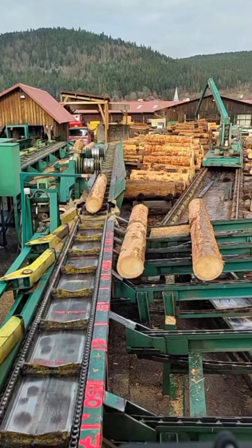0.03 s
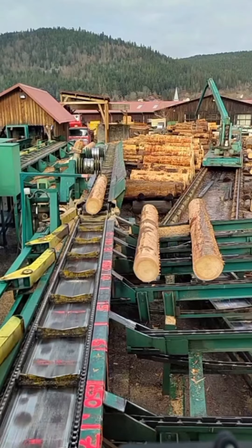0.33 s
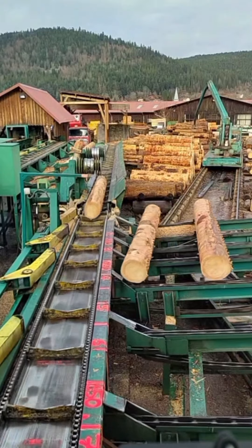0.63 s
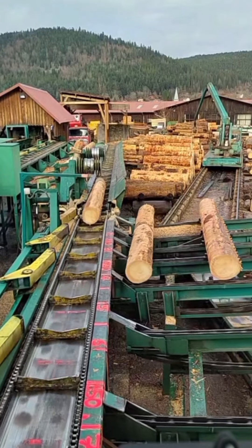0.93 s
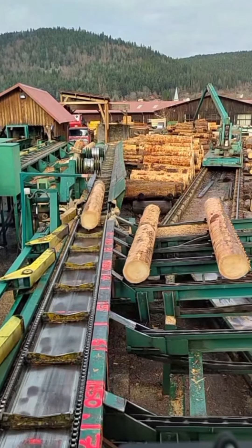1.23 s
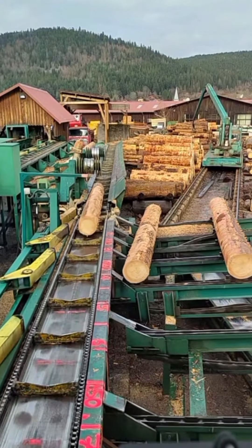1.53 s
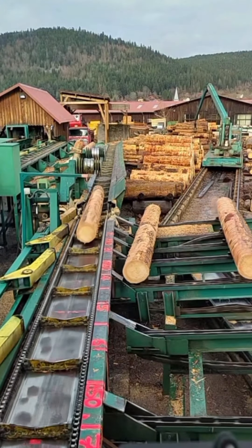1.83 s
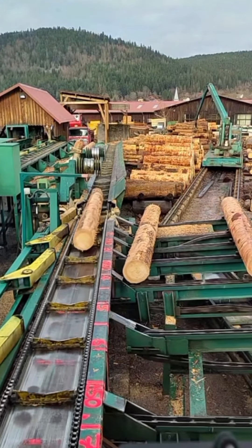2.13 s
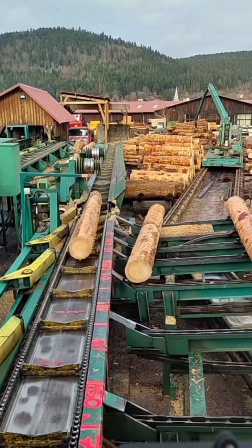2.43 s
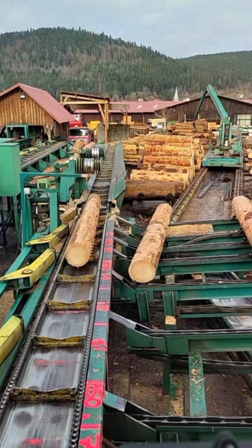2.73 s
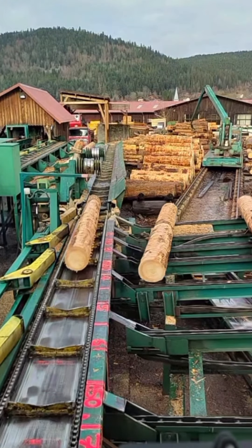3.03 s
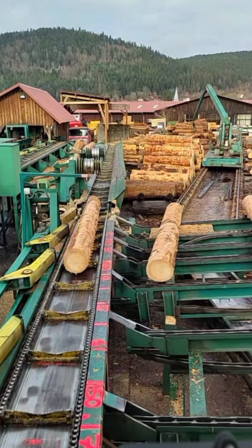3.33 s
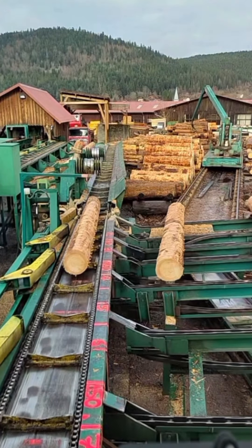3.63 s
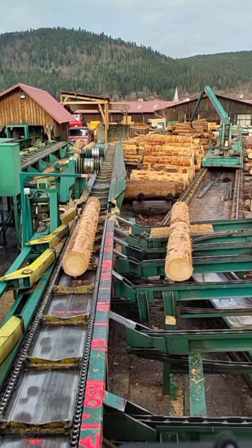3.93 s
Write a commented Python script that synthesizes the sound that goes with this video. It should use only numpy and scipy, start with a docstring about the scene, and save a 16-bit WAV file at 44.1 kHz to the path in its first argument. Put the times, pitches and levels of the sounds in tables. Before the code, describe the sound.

A log conveyor hums and rumbles throughout, over the hiss of distant machinery. Bark scuffs lightly, then steel clanks sharply at 0.6 seconds. Chains drag and groan on the track until nearly 3 seconds. Logs boom low and knock with a rattle around 1.1 seconds and harder at 2.7. Wood clacks far off at 3.6, and the hum cuts out with a last knock near 4 seconds.

```python
"""A sawmill log conveyor's drive hums near 300 Hz, sags as logs jolt it, and cuts out at the end.
The frame rumbles under the hiss of distant machinery; dragging chains ring the steel track
and groan where they catch. Bark scuffs, steel clanks once, logs boom and knock on the frame,
and wood clacks far off in the open yard. A fast limiter ducks the hum under loud blows."""
import sys
import numpy as np
from scipy.fft import rfft, irfft, next_fast_len
from scipy.io import wavfile
from scipy.ndimage import uniform_filter1d, minimum_filter1d, map_coordinates

SR = 44100
rng = np.random.default_rng(int(sys.argv[2]) if len(sys.argv) > 2 else 0)


def store_wav(level_fs):
    """Save 16-bit WAV to argv[1]."""
    pcm = np.round(np.clip(np.atleast_2d(level_fs), -1, 1) * 32767)
    wavfile.write(sys.argv[1], SR, pcm.T.astype(np.int16))


N = 176400
T = np.arange(N) / SR


def amp(db):
    """Decibels to gain."""
    return 10 ** (np.asarray(db) / 20)


def unit(x):
    """Scale to rms 1."""
    return x / np.sqrt(np.mean(x ** 2) + 1e-20)


def log_interp(points, hz):
    """(f/Hz, value) points, interpolated over log frequency."""
    f, value = np.transpose(points)
    return np.interp(np.log(hz + 1), np.log(f + 1), value)


def curve(points):
    """(t/s, value) points, interpolated per sample."""
    return np.interp(T, *np.transpose(points))


def wobble(knots_per_s):
    """Smooth random curve, rms near 1."""
    return map_coordinates(rng.standard_normal(2048), [T * knots_per_s], mode="wrap")


def rough_tone(phase, knots_per_s):
    """Narrow noise band around a running phase, rms near 1."""
    return wobble(knots_per_s) * np.sin(phase) + wobble(knots_per_s) * np.cos(phase)


def blow(start_s, rise_s, t60_s):
    """Impact envelope: linear rise, exponential decay."""
    age = T - start_s
    return np.clip(age / rise_s, 0, 1) * amp(-60 * np.maximum(age - rise_s, 0) / t60_s)


def swell(centre_s, length_s):
    """Half-cosine envelope."""
    return np.cos(np.pi * np.clip((T - centre_s) / length_s, -.5, .5))


def filtered(x, response):
    """Apply a frequency response."""
    size = next_fast_len(N + SR // 2)
    hz = np.fft.rfftfreq(size, 1 / SR)
    return irfft(rfft(x, size) * response(hz), size)[..., :N]


def colour(points):
    """Response through (f/Hz, gain/dB) points."""
    return lambda hz: amp(log_interp(points, hz))


def body(modes):
    """Response of parallel resonances, alternating in sign."""
    return lambda f: sum((-1) ** k * amp(db) * 1j * f * width / (f0 * f0 - f * f + 1j * f * width)
                         for k, (f0, width, db) in enumerate(modes))


# left-right coherence: f/Hz, correlation
COHERENCE = [(4100, 1), (4500, .92), (5500, .85), (7000, .94), (8000, .88), (9000, .5), (13000, .35)]

def noise(response):
    """Stereo noise of rms 1, mono in the bass, wider in the treble."""
    def mid_side_response(hz):
        angle = np.arccos(np.clip(log_interp(COHERENCE, hz), -1, 1)) / 2
        return response(hz) * np.array([np.cos(angle), np.sin(angle)])
    mid, side = filtered(rng.standard_normal((2, N)), mid_side_response)
    return unit(np.array([mid + side, mid - side]))


# drive pitch: t/s, f/Hz
HUM_PITCH = [(.1, 301.2), (.3, 300.5), (.55, 298.3), (.9, 300), (1.14, 293.8), (1.26, 300.8), (1.65, 298.2),
             (1.82, 300.3), (2.1, 296.5), (2.3, 300), (2.58, 298.5), (2.7, 290.8), (2.86, 299.4),
             (3.25, 299.6), (3.5, 300.6), (3.7, 298.5), (3.82, 300), (3.95, 294.8)]
# hum, sagging at log jolts: t/s, level/dB
HUM_LEVEL = [(.1, -34.5), (.4, -33.5), (.7, -37), (1.0, -34), (1.17, -38.5), (1.35, -34.5), (2.55, -35),
             (2.63, -39.5), (2.76, -37.5), (2.9, -34.5), (3.35, -32), (3.7, -35), (3.95, -34)]
OCTAVE_DB, OCTAVE_SAG_DB, FLUTTER_DB = -22, 5.5, -45.5
SWAY_RAD, STOP_S, FADE_S = .26, 3.953, .015

def drive():
    """Drive hum with a weak, rough octave; chain load adds sway and flutter and sinks the octave."""
    drag_db, hum_db = curve(CHAIN_DRAG), curve(HUM_LEVEL)
    load = amp(drag_db - drag_db.max())
    sway = SWAY_RAD * (.28 + load) * wobble(15)
    phase = 2 * np.pi * np.cumsum(curve(HUM_PITCH)) / SR + sway
    tone = amp(hum_db + .9 * wobble(23.97)) * np.sin(phase)
    octave_db = hum_db + OCTAVE_DB - OCTAVE_SAG_DB * load + 1.8 * wobble(9.7)
    octave = amp(octave_db) * (np.sin(2 * phase) + .33 * rough_tone(2 * phase, 50))
    flutter = amp(FLUTTER_DB) * (.3 + .5 * load) * rough_tone(phase, 60)
    running = np.clip(1 - (T - STOP_S) / FADE_S, 0, 1)
    return (np.sqrt(2) * (tone + octave) + flutter) * running


# frame shaking, before trim: t/s, level/dB
RUMBLE_LEVEL = [(.1, -46.5), (.5, -47.5), (.8, -45.5), (.95, -46.5), (1.1, -44.5), (1.35, -46.5),
                (1.6, -45.5), (2.1, -50), (2.5, -46.5), (2.75, -47), (3.0, -46), (3.35, -49), (3.65, -46.5),
                (3.98, -46)]
# rumble spectrum: f/Hz, gain/dB
RUMBLE_SPECTRUM = [(20, -12.5), (40, -8), (62, -3.5), (80, 1.5), (110, -3), (160, -2.5), (210, -7.5),
                   (330, -6), (400, -14.5), (520, -24), (800, -29.5), (2000, -59), (5000, -94.5)]

def rumble(trim_db=1.8, lumps_db=1.9):
    """Low, lumpy shaking of the conveyor frame."""
    return amp(curve(RUMBLE_LEVEL) + trim_db + lumps_db * wobble(14)) * noise(colour(RUMBLE_SPECTRUM))


# chains dragging under load: t/s, level/dB
CHAIN_DRAG = [(.1, -67.5), (.35, -60.5), (.65, -51.5), (.9, -51), (1.15, -52), (1.55, -51), (2.45, -51),
              (2.7, -53.5), (2.9, -58.5), (3.2, -69.5), (3.9, -67.5)]
# track resonances: f/Hz, width/Hz, gain/dB
TRACK_MODES = [(533, 330, -7), (767, 200, -7), (986, 54, 2), (1267, 120, -3), (1573, 120, -4.5)]
# track tilt: f/Hz, gain/dB
TRACK_TILT = [(200, -5.5), (500, -1.5), (1700, -3.5), (2300, -4), (5000, -10.5), (9000, -38.5)]

def chains(contacts_per_s=700, surge_db=2, chatter_db=1.5):
    """Link contacts and scraping ring the steel track; each resonance surges on its own."""
    ring = np.zeros(N)
    for mode in TRACK_MODES:
        contacts = (rng.random(N) < contacts_per_s / SR) * rng.standard_normal(N)
        scrape = 1.2 * rng.standard_normal(N)
        force = (unit(contacts) + scrape) * amp(surge_db * wobble(20))
        ring += filtered(force, body([mode]))
    return amp(curve(CHAIN_DRAG) + chatter_db * wobble(55)) * unit(filtered(ring, colour(TRACK_TILT)))


# mill hiss: t/s, level/dB
HISS_LEVEL = [(.1, -54), (.5, -53.5), (.85, -55.5), (1.15, -53.5), (1.6, -54.5), (2.3, -56), (2.8, -54.5),
              (3.25, -52), (3.7, -55.5), (4, -53)]
# hiss spectrum: f/Hz, gain/dB
HISS_SPECTRUM = [(100, -2.5), (450, 6.5), (1000, 3.5), (1500, 1), (2400, -2), (4000, -8.5), (5100, -7),
                 (5750, -1.5), (6400, -1), (7000, -12.5), (8300, -18), (12000, -15), (14000, -12.5)]

def mill_hiss(shimmer_db=.45):
    """Wash of distant machinery, shimmering slightly."""
    level_db = curve(HISS_LEVEL) + shimmer_db * (wobble(18) + wobble(150))
    return amp(level_db) * noise(colour(HISS_SPECTRUM))


# bark rubs: centre t/s, length/s, level/dB
SCUFFS = [(0.317, 0.068, -58), (0.516, 0.17, -57), (.77, 0.092, -61.5), (1.07, 0.11, -63.5),
          (1.804, 0.3, -65), (3.24, .12, -60.5)]
# bark spectrum: f/Hz, gain/dB
BARK_SPECTRUM = [(500, -23.5), (1400, 3.5), (2200, 3.5), (3000, -1), (4500, -12), (7000, -20),
                 (12000, -16.5)]

def bark_scuffs(grain_db=2.3):
    """Short, grainy rubs of bark on steel."""
    strokes = sum(amp(db) * swell(t, length) for t, length, db in SCUFFS)
    return strokes * unit(amp(grain_db * wobble(200)) * noise(colour(BARK_SPECTRUM)))


# steel blow and rebounds: t/s, relative level/dB
CLANK_CONTACTS = [(0.61, -28.5), (0.6213, -33), (.646, -46)]
# crack and crash spectra: f/Hz, gain/dB
CRACK_SPECTRUM = [(200, -7), (1500, -6), (4200, 3), (6500, -2), (8500, -4.5), (12000, 0), (14000, -20)]
CRASH_SPECTRUM = [(200, 9), (1200, 4.5), (3000, 4), (6000, -10), (8500, 0), (12000, 8), (14000, 0.5)]
# steel resonances: f/Hz, width/Hz, gain/dB
STEEL_MODES = [(1790, 90, -8), (2006, 100, -5), (3050, 130, -3.5), (3330, 150, -5), (4000, 150, -6),
               (4320, 110, -2.5), (4840, 200, -5.5), (5610, 90, 2), (5740, 90, 2.5), (6280, 180, -2),
               (6870, 120, -9), (11800, 250, -2.5), (12600, 400, -5.5)]

def clank():
    """Hard steel blow, centred: one crack, then a bright crash and short ring per contact."""
    start, first_db = CLANK_CONTACTS[0]
    crack = amp(first_db + 1.5) * noise(colour(CRACK_SPECTRUM)).mean(axis=0)
    crack *= blow(start, rise_s=.0016, t60_s=.026)
    contacts = sum(amp(db) * blow(t, rise_s=.0051, t60_s=.075) for t, db in CLANK_CONTACTS)
    crash = amp(-3.3) * noise(colour(CRASH_SPECTRUM))
    ring = amp(-2.5) * noise(body(STEEL_MODES)).mean(axis=0)
    return crack + contacts * (crash + ring)


# chain catches: centre t/s, length/s, level/dB, f/Hz
GROANS = [(0.688, 0.11, -53, 1000), (0.802, .12, -53.5, 1005), (0.919, 0.061, -50, 960),
          (1.302, 0.11, -54.5, 985), (1.387, 0.098, -51.5, 1000), (1.57, 0.092, -50.5, 962),
          (1.72, 0.1, -53.5, 975), (1.91, 0.21, -53.5, 995), (2.109, 0.047, -52.5, 975),
          (2.355, 0.11, -53, 990), (2.448, 0.099, -54.5, 995), (2.55, 0.086, -53, 965)]
# groan partials: pitch ratio, gain/dB
GROAN_PARTIALS = [(1, -1.5), (1.33, -7), (1.62, -7.5)]

def groans(drift_fraction=.01212, flutter_per_s=55):
    """The chain catches briefly and the track sings at a rough, drifting pitch."""
    rad_per_hz = 2 * np.pi * np.cumsum(1 + drift_fraction * wobble(20)) / SR
    sound = np.zeros(N)
    for t, length, db, hz in GROANS:
        tone = sum(amp(gain_db) * rough_tone(ratio * hz * rad_per_hz, flutter_per_s)
                   for ratio, gain_db in GROAN_PARTIALS)
        sound += amp(db) * swell(t, length) * tone
    return sound


# log resonances: centre t/s, length/s, f/Hz, level/dB
BOOMS = [(1.086, 0.22, 75, -43), (1.155, 0.13, 106.4, -46.5), (2.009, 0.13, 164, -43),
         (2.266, 0.15, 163.8, -42), (2.763, 0.079, 197, -46.5), (2.859, 0.066, 240, -37.5),
         (3.78, 0.19, 185.3, -50.5), (3.68, 0.17, 90.7, -44.5), (3.947, 0.17, 154.5, -45.5)]

def log_booms(sway_rad=.2):
    """Low resonances swell and fade as logs ride over the chains."""
    return np.sqrt(2) * sum(
        amp(db) * swell(t, length) * np.sin(2 * np.pi * hz * T + sway_rad * wobble(25))
        for t, length, hz, db in BOOMS)


# logs striking the frame: t/s, thud level/dB, rattle level/dB, t60/s
KNOCKS = [(1.076, -44, -52, 0.22), (1.168, -44, -51, .2), (2.62, -40, -55.5, 0.27),
          (2.654, -35.5, -50.5, 0.31), (2.741, -41, -51.5, 0.18), (2.795, -47.5, -61, .12),
          (3.977, -39.5, -50.5, 0.2)]
# thud and rattle spectra: f/Hz, gain/dB
THUD_SPECTRUM = [(30, -13), (80, -1.5), (200, 0.5), (300, 10.5), (450, -9), (1300, -11.5), (2200, -23.5),
                 (6000, -42)]
RATTLE_SPECTRUM = [(300, 7), (1200, -2), (2500, 2), (4200, -2.5), (6200, 7.5), (8300, -19.5), (12000, -4.5),
                   (14000, -18)]

def log_knocks(rise_s=.02, ragged_db=1.2):
    """Each knock thuds and sets off a ragged rattle in the steelwork."""
    thud = noise(colour(THUD_SPECTRUM))
    rattle = unit(noise(colour(RATTLE_SPECTRUM)) * amp(ragged_db * wobble(120)))
    return sum(blow(t, rise_s, t60) * (amp(thud_db) * thud + amp(rattle_db) * rattle)
               for t, thud_db, rattle_db, t60 in KNOCKS)


# clack resonances: f/Hz, width/Hz, gain/dB
CLACK_MODES = [(984, 120, 1), (2034, 80, 2), (2220, 150, -1), (2480, 150, -2), (2760, 100, 0.5),
               (3300, 160, -5.5), (3710, 160, -8.5), (4360, 100, -12), (6120, 500, -13.5)]

def far_clack(level_db=-46.7):
    """Distant wooden clack, smeared by the yard."""
    return amp(level_db) * blow(start_s=3.556, rise_s=.019, t60_s=.28) * noise(body(CLACK_MODES))


def scene():
    """Continuous machinery plus short events, in stereo."""
    machinery = drive() + rumble() + chains() + mill_hiss()
    return machinery + bark_scuffs() + clank() + groans() + log_booms() + log_knocks() + far_clack()


def limiter(x, threshold_db=-28.6, release_db_per_s=298.5):
    """Gain drops just ahead of each peak and recovers at a steady rate."""
    peak_db = 20 * np.log10(np.abs(x).max(axis=0) + 1e-9)
    over_db = np.maximum(peak_db - threshold_db, 0)
    release_db = release_db_per_s * T
    cut_db = np.maximum.accumulate(over_db + release_db) - release_db
    return x * uniform_filter1d(minimum_filter1d(amp(-cut_db), size=65), size=65)


# treble shelf: f/Hz, gain/dB
TREBLE_SHELF = [(6900, -2), (7400, -6.5), (8000, -17.5), (9000, -16.5), (14000, -18.5)]

def record(dry, start_s=.082, cutoff_hz=14200):
    """Limiter, dulled treble, silent lead-in, steep low-pass."""
    gate = np.clip((T - start_s) / .0008, 0, 1)
    sound = filtered(limiter(dry), colour(TREBLE_SHELF)) * gate
    return filtered(sound, lambda hz: 1 / (1 + (hz / cutoff_hz) ** 120))


dry = scene()
out = record(dry)
store_wav(out)
```